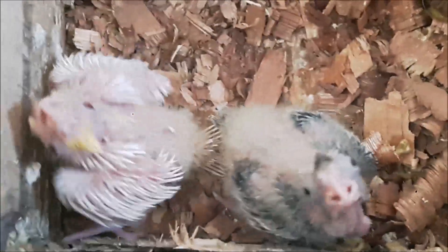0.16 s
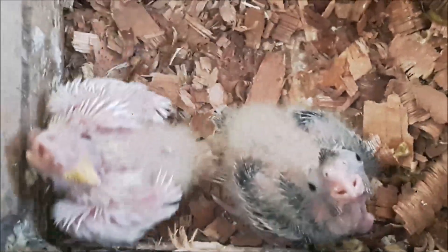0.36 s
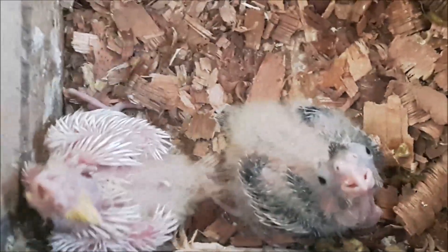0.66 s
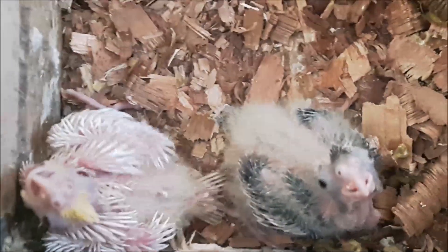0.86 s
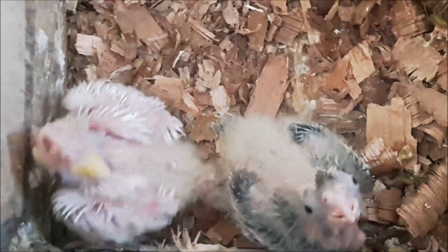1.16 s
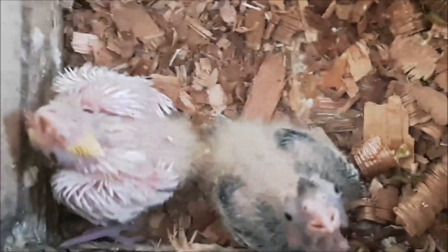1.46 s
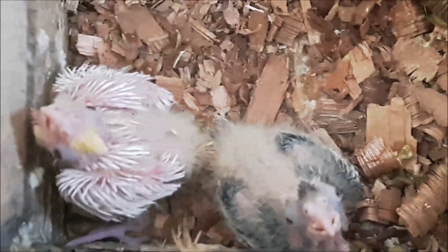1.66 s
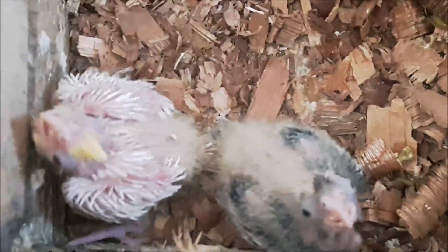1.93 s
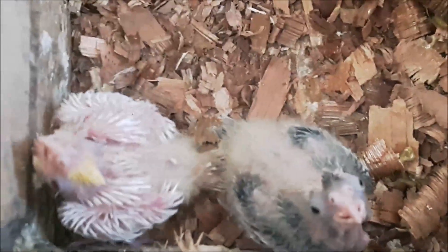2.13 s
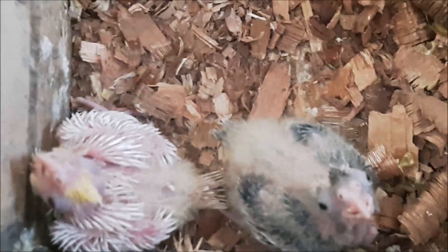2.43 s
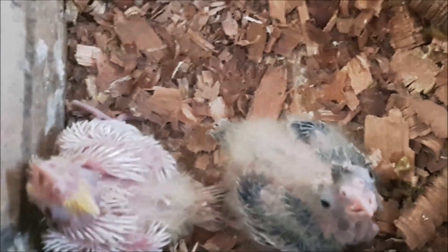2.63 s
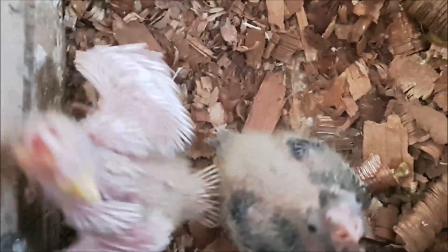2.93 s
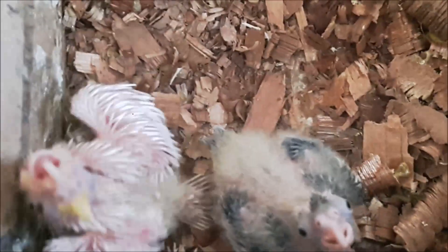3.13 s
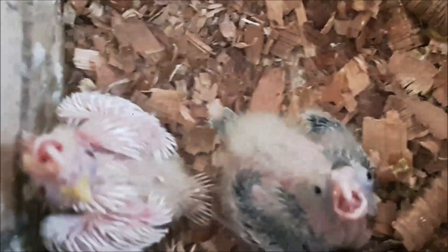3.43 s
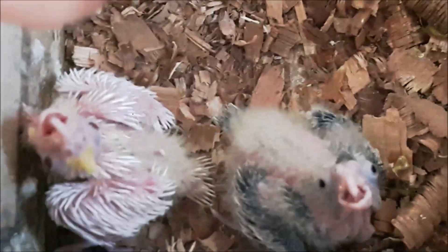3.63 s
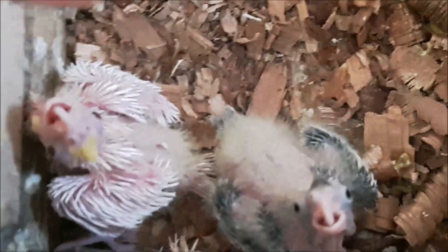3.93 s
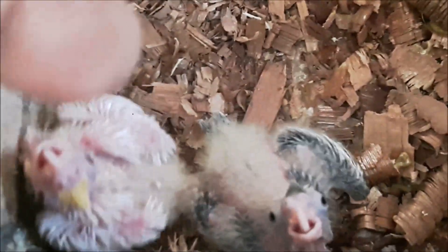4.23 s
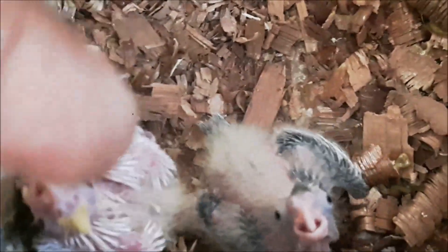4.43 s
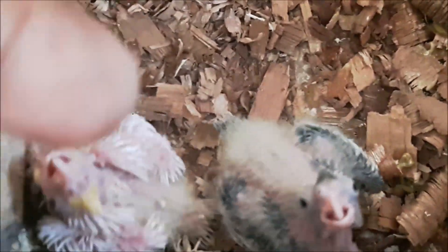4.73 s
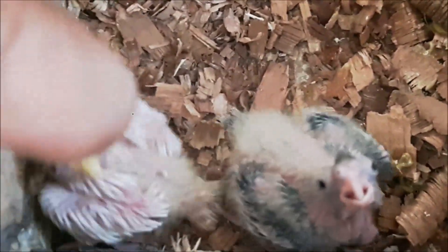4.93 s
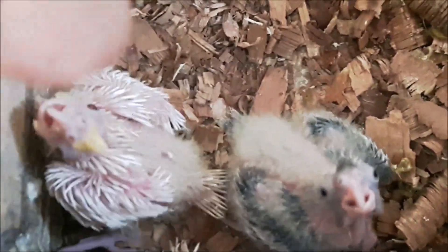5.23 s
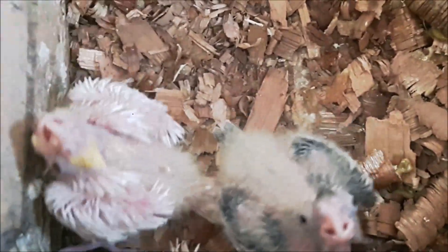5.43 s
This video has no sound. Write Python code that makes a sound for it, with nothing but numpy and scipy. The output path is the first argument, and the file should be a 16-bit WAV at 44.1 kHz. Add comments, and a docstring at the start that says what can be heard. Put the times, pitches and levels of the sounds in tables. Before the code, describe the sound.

Inside a wooden nest box, recorded close with a phone: scattered quick falling chirps, a rising whistle and light feathery rustles over low rumble. Then a parrot chick begs, its quiet rasp turning into a thin trembling squeal that climbs and bursts into a long, rough, breathy hiss, while adult birds whistle in the room behind.

```python
"""Wooden nest box: a parrot chick begs close to a phone with a hiss, a clean rising squeal, a long hoarse hiss.
The chick is a harmonic pulse train, regular or chaotic, plus breath noise, heard through box wall echoes.
Grown birds, near-sine glides, whistle and chirp in the echoing room outside.
Banded noise makes shavings and feathers rustle; a decaying sine knocks; noise makes low rumble and room tone.
"""
import sys
import numpy as np
from scipy import signal
from scipy.fft import rfft, irfft
from scipy.io import wavfile
from scipy.ndimage import uniform_filter1d, map_coordinates

SR = 44100
rng = np.random.default_rng(int(sys.argv[2]) if len(sys.argv) > 2 else 0)


def dump_mix(stems):
    """Bounce the given channels to the path in sys.argv[1] as a 16-bit WAV at rate SR."""
    frames = np.atleast_2d(stems).T  # one column per channel
    limited = np.clip(frames, -1, 1)  # hard clip at full scale
    pcm = np.round(limited * 32767).astype(np.int16)
    wavfile.write(sys.argv[1], SR, pcm)


N = 246519
T = np.arange(N) / SR
HZ = np.fft.rfftfreq(N, 1 / SR)
TOP_HZ = 15800


def undb(db):
    """Decibels to amplitude."""
    return 10 ** (np.asarray(db) / 20)


def unit(x):
    """Scale to RMS 1."""
    return x / np.sqrt(np.mean(x ** 2))


def even(x):
    """Steady the level over 1/8 s windows."""
    return x / np.sqrt(uniform_filter1d(x ** 2, size=SR // 8) + 1e-9)


def colour(x, table):
    """Shape the spectrum by (hz, db) points, linear in log frequency."""
    hz, db = np.transpose(table)
    gain = undb(np.interp(np.log(HZ + 1), np.log(hz), db))
    return irfft(rfft(x) * gain, N)


def band(x, hz, width_hz):
    """Steep resonance, half amplitude at the edges of width_hz."""
    return irfft(rfft(x) / (1 + (2 * (HZ - hz) / width_hz) ** 4), N)


def walk(rate_hz):
    """Random levels, redrawn at rate_hz and slewed between; RMS 1."""
    hold = max(int(SR / rate_hz), 1)
    steps = np.repeat(rng.standard_normal(N // hold + 1), hold)
    return unit(uniform_filter1d(steps, hold)[:N])


def gate(start_s, length_s, rise_s, fade_s):
    """Linear rise, hold to start + length, exponential fade with time constant fade_s (2 ms at least)."""
    opening = np.clip((T - start_s) / rise_s, 0, 1)
    return opening * np.exp(-np.clip(T - start_s - length_s, 0, 1) / max(fade_s, .002))


def syrinx(pitch_hz, jitter):
    """Pulse train: up to 14 equal harmonics below TOP_HZ, pitch shaken by the fraction jitter."""
    phase = 2 * np.pi * np.cumsum(pitch_hz * (1 + jitter)) / SR
    return unit(sum(np.cos(k * phase) * (k * pitch_hz < TOP_HZ) for k in range(1, 15)))


# chick voice: time_s, pitch_hz, level_db
CHICK_VOICE = [(2.86, 1100, -41.5), (3.068, 1132, -34), (3.091, 1126, -38), (3.13, 1240, -34),
               (3.179, 1270, -32), (3.255, 1365, -32), (3.33, 1410, -33.5), (3.48, 1438, -34.5),
               (3.598, 1494, -35), (3.68, 1554, -37), (3.734, 1640, -34), (3.775, 1655, -36.5),
               (3.805, 1729, -33), (3.866, 1855, -33), (3.925, 1900, -29), (3.94, 1900, -24.5),
               (4.4, 2007, -19.5), (4.65, 2039, -18), (4.95, 2000, -19.5), (5.25, 2010, -25),
               (5.59, 1994, -21.5)]
# clean spells, syrinx locked: start_s, length_s, chaos_left (0-1), warble_hz
SQUEALS = [(3.075, .1, 0.23, 24), (3.248, .675, 0.03, 7.9)]
HISS_CHAOS, LOCK_S, WARBLE_PER_S = 0.98, 0.013, 38  # chaos outside squeals; time to lock or break
# squeal colour: freq_hz, relative_db
SQUEAL_COLOUR = [(1000, -4), (1400, 11), (1900, 9), (2800, -3), (3700, 1), (4300, 1.5), (5500, 1),
                 (6800, -11.5), (8400, 1), (9500, -6), (10800, -20), (12500, -19), (14000, -14),
                 (15700, -28)]
# hiss colour (windpipe, beak, box), neck at rest: freq_hz, relative_db
THROAT_REST = [(400, -38), (760, -19), (1110, -12), (1300, -7.5), (1720, -3), (2010, -4.5), (2160, -10),
               (2335, 3), (2600, -6.5), (2950, -13), (3850, -15.5), (4350, -13.5), (5080, -13.5),
               (5520, -14.5), (6000, -24), (6450, -27.5), (9120, -21), (11000, -39.5), (15800, -33)]
# hiss colour, neck stretched: freq_hz, relative_db
THROAT_STRETCHED = [(400, -32), (1110, -13.5), (1300, -9), (1630, -3), (1960, 1.5), (2140, -7), (2310, 0.5),
                    (2560, -6.5), (2950, -11), (3850, -15), (4300, -9.5), (5080, -11.5), (5520, -11.5),
                    (6000, -20.5), (6740, -22), (9120, -21.5), (11000, -39.5), (15800, -29)]
# hiss colour as the breath runs out: freq_hz, relative_db
THROAT_FADING = [(400, -29.5), (840, -18.5), (1090, -12.5), (1280, -7.5), (1610, -3.5), (1970, 0),
                 (2500, -3), (3000, -9.5), (3850, -9.5), (4250, -5), (4800, -15.5), (6270, -17.5),
                 (11000, -31.5), (15800, -30.5)]
# neck: time_s, pose (0 rest, 1 stretched, 2 fading)
NECK = [(4.35, 0), (4.75, 1), (4.93, 1), (4.99, 2), (5.59, 2)]
# treble shelf: time_s, shelf_db (limit well above 6 kHz)
TREBLE = [(2.86, 10), (3.2, 11), (3.5, 18), (3.9, 17.5), (3.95, 12.5), (4.93, 2.5), (4.98, -18), (5.3, -8),
          (5.59, -3)]


def chick():
    """Syrinx pulses, even in the squeal, break into irregular cycles and gusts of air in the hiss."""
    time_s, *columns = np.transpose(CHICK_VOICE)
    pitch_hz, level_db = (np.interp(T, time_s, c) for c in columns)
    chaos = np.full(N, HISS_CHAOS)
    for start_s, length_s, chaos_left, warble_hz in SQUEALS:
        edge_s = np.minimum(T - start_s, start_s + length_s + LOCK_S - T)
        lock = np.clip(edge_s / LOCK_S, 0, 1)
        chaos += lock * (chaos_left - HISS_CHAOS)
        pitch_hz = pitch_hz + lock * warble_hz * np.sin(2 * np.pi * WARBLE_PER_S * (T - start_s))
    chaos = np.clip(chaos, 0, 1)

    regular = syrinx(pitch_hz, .006 * walk(110))
    broken = syrinx(pitch_hz, .3 * walk(1800))
    air = rng.standard_normal(N) * undb(2.0 * walk(300))

    raw_hiss = (broken + 0.81 * air) * undb(0.18 * walk(40))
    neck = np.interp(T, *np.transpose(NECK))
    hiss = np.zeros(N)
    for pose, throat in enumerate((THROAT_REST, THROAT_STRETCHED, THROAT_FADING)):
        share = np.clip(1 - abs(neck - pose), 0, 1)
        hiss += share * unit(colour(raw_hiss, throat))
    hiss = even(hiss)
    squeal = even(colour(regular * undb(1.05 * walk(60)) + 0.037 * air, SQUEAL_COLOUR))

    voice = np.sqrt(1 - chaos) * squeal + np.sqrt(chaos) * hiss
    treble = signal.sosfilt(signal.butter(1, 6000, "high", fs=SR, output="sos"), voice)
    voice += (undb(np.interp(T, *np.transpose(TREBLE))) - 1) * treble
    return voice * undb(level_db) * (T > time_s[0])


# wall echoes, left then right port: delay_ms, relative_gain
BOX_ECHOES = [
    [(0, 0.72), (.2, 0.46), (.32, 0.58), (1.91, -0.072), (2.36, -0.023)],
    [(.2, 0.67), (.26, 0.35), (.4, 0.79), (.97, -0.53), (1.73, 0.97)],
]
SWAY_MS = .009  # RMS per path index: paths change as the birds sway


def box(x):
    """Each port hears the sound with its own close wall echoes; later paths sway more."""
    out = np.zeros((2, N))
    for side, port in enumerate(BOX_ECHOES):
        for k, (delay_ms, gain) in enumerate(port):
            lag = (delay_ms + SWAY_MS * k * walk(2.5)) * SR / 1000  # samples
            out[side] += gain * map_coordinates(x, [np.arange(N) - lag], order=3)
        out[side] /= np.sqrt(sum(gain ** 2 for _, gain in port))
    return out


LEAD_S, GLIDE_S, LEAD_DB = 0.024, 0.049, -6.5  # low opening note, leap to the shelf
CREST, DROP_DB = .76, -13  # share of length at the crest; end level re crest


def whistle(start_s, length_s, lead_hz, shelf_hz, crest_hz, end_hz, crest_db, swell_db):
    """Turning points (time_s, pitch_hz, level_db): low lead, leap, swell to the crest, drop."""
    shelf_db = crest_db - swell_db
    lead_end_s = start_s + LEAD_S
    return [(start_s, lead_hz, shelf_db + 2 * LEAD_DB),
            (lead_end_s, lead_hz, shelf_db + LEAD_DB),
            (lead_end_s + GLIDE_S, shelf_hz, shelf_db),
            (start_s + CREST * length_s, crest_hz, crest_db),
            (start_s + length_s, end_hz, crest_db + DROP_DB)]


def glide(start_s, length_s, from_hz, to_hz, level_db):
    """Turning points of a straight glide at one level."""
    return [(start_s, from_hz, level_db), (start_s + length_s, to_hz, level_db)]


def call_tone(points, rasp, second, rise_s, shake, throb, drift):
    """Near-sine call; rasp shakes pitch and level, a slower second oscillation adds a band below."""
    time_s, hz, db = np.transpose(points)
    span = slice(int(time_s[0] * SR), min(int(time_s[-1] * SR), N))
    t = T[span]
    pitch_hz = np.interp(t, time_s, hz)
    phase = 2 * np.pi * np.cumsum(pitch_hz + 170 * rasp ** 2 * shake[span]) / SR
    below = phase - 2 * np.pi * np.cumsum(.2 * pitch_hz * (1 + .25 * drift[span])) / SR
    split = 1.2 * second ** 1.5 * np.clip(pitch_hz / 400 - 4.5, 0, 1)  # sets in from 1.8 to 2.2 kHz
    octave = undb(-17 - 55 * np.clip(pitch_hz / 1750 - 1, 0, .6))  # low notes keep more octave
    tone = np.sin(phase) + octave * np.sin(2 * phase) + split * np.sin(below)
    edge = np.clip(np.minimum(t - time_s[0], time_s[-1] - t) / rise_s, 0, 1)
    return span, edge * undb(np.interp(t, time_s, db) + 5 * rasp * throb[span]) * tone


# faint low notes: start_s, length_s, level_db
HOOTS = [(1.268, 0.042, -49), (1.329, 0.15, -55), (1.41, 0.07, -59), (2.656, 0.1, -47)]
HOOT_HZ = 520


def hoots():
    """Gated sine with a wandering phase."""
    level = sum(undb(db) * gate(s, length_s, 0.0033, 0.05) for s, length_s, db in HOOTS)
    return level * np.sin(2 * np.pi * HOOT_HZ * T + 2.7 * walk(30))


# rising whistles: start_s, length_s, lead_hz, shelf_hz, crest_hz, end_hz, crest_db, swell_db
WHISTLES = [(1.67, .27, 1584, 2440, 2751, 2203, -13.5, 7), (2.788, .27, 1780, 2786, 2949, 2507, -14.5, 4),
            (3.096, 0.25, 1600, 2563, 2556, 2467, -21.5, -2.5),
            (5.085, 0.24, 1790, 2500, 2728, 2708, -11, 7), (5.372, .27, 2010, 2722, 3027, 2950, -20, -1.5)]
# one per whistle: rasp (0-1)
WHISTLE_RASP = [.55, .7, .65, .3, .7]
# thin even notes: start_s, length_s, pitch_hz, level_db
STEADY = [(2.312, 0.014, 3580, -31), (2.352, 0.17, 3606, -36.5), (2.363, 0.3, 2850, -53.5)]
# short chirps: start_s, length_s, from_hz, to_hz, level_db
CHIRPS = [(0, 0.0071, 2490, 2480, -13), (0.058, 0.05, 2460, 2517, -22), (0.245, 0.058, 2210, 3037, -22),
          (0.293, 0.1, 2870, 2320, -34.5), (.385, 0.041, 2350, 2190, -33), (3.636, 0.064, 1622, 2033, -31),
          (3.793, .04, 2360, 2840, -22.5), (3.835, .025, 2850, 2720, -29), (0, 0.05, 4890, 2770, -21.5),
          (0.142, 0.07, 5550, 4200, -29.5), (0.18, 0.032, 3544, 3516, -12), (0.211, 0.031, 3395, 3255, -19),
          (0.184, 0.024, 2077, 2230, -27), (0.084, 0.03, 2554, 1817, -24), (0.277, 0.049, 3205, 2810, -25),
          (0.184, 0.031, 6440, 6580, -37), (0.615, 0.056, 3770, 4170, -49), (0.678, 0.01, 2210, 2130, -42),
          (0.921, 0.059, 4990, 2576, -18), (0.984, 0.028, 2510, 1870, -24.5),
          (1.015, 0.045, 3480, 2700, -20.5), (1.075, 0.022, 5600, 3800, -37.5),
          (1.091, 0.035, 3366, 3255, -24.5), (1.123, 0.029, 3280, 2330, -26),
          (1.207, 0.047, 3880, 3585, -40.5), (1.227, 0.029, 1770, 2040, -40),
          (1.254, 0.035, 3160, 2735, -24.5), (1.273, 0.022, 4900, 3510, -41.5),
          (1.308, 0.027, 3227, 2120, -26.5), (1.414, 0.01, 4050, 2910, -28),
          (1.424, 0.016, 1886, 1980, -24), (1.438, 0.037, 3023, 2535, -20),
          (1.49, 0.025, 3800, 3570, -28.5), (1.543, 0.025, 2120, 2234, -33),
          (1.638, 0.024, 3490, 4350, -47.5), (1.838, 0.059, 5080, 2860, -23.5),
          (1.885, 0.058, 1114, 1500, -38.5), (1.941, .03, 3395, 3126, -25.5),
          (2.18, 0.041, 4460, 2300, -35), (2.284, 0.026, 2554, 1653, -24.5),
          (2.297, 0.037, 3480, 3150, -31), (2.337, 0.08, 1578, 1606, -38), (2.567, 0.054, 1453, 1567, -40),
          (2.852, 0.032, 6210, 4500, -30.5), (2.872, 0.056, 4800, 3000, -20),
          (2.975, 0.01, 3350, 3280, -14), (3.414, 0.053, 5110, 2730, -18.5),
          (3.465, 0.025, 3540, 3390, -24), (3.787, 0.027, 4700, 3390, -33.5),
          (5.15, 0.029, 2585, 2560, -26), (4.593, 0.0396, 4600, 3590, -20.5),
          (4.68, 0.024, 3547, 2986, -23), (4.905, 0.045, 4520, 3310, -21.5),
          (5.115, 0.029, 3620, 3160, -25), (5.337, 0.013, 3924, 3620, -16), (5.473, 0.057, 4380, 3650, -32)]
STEADY_RASP, CHIRP_RASP = .05, .65  # 0-1


def flock():
    """Grown birds: whistles with a second oscillation, thin even notes, chirps, hoots."""
    calls = [(whistle(*row), rasp, rasp, .003) for row, rasp in zip(WHISTLES, WHISTLE_RASP)]
    for start_s, length_s, pitch_hz, level_db in STEADY:
        calls.append((glide(start_s, length_s, pitch_hz, pitch_hz, level_db), STEADY_RASP, 0, .005))
    for row in CHIRPS:
        calls.append((glide(*row), CHIRP_RASP, 0, row[1] / 4))
    out, shake, throb, drift = np.zeros(N), walk(500), walk(130), walk(60)
    for call in calls:
        span, tone = call_tone(*call, shake, throb, drift)
        out[span] += tone
    return out + hoots()


EARLY_T60_S, EARLY_DB = .07, -1.5  # strong first echoes break up the glides
ROOM_T60_S, ROOM_DB = .25, 0  # dB re direct sound, both tails
ROOM_PAN_DB = -3.8  # left re right


def room(x):
    """Direct sound, first echoes and a dense tail: decaying noise, different at each port."""
    t, response = T[:SR], np.zeros((2, SR))
    for t60_s, db in ((EARLY_T60_S, EARLY_DB), (ROOM_T60_S, ROOM_DB)):
        decay = np.exp(-np.log(1000) * t / t60_s) * np.clip(t / .003, 0, 1)
        tail = rng.standard_normal((2, SR)) * decay
        response += undb(db) * tail / np.sqrt(np.sum(tail ** 2, axis=1, keepdims=True))
    response[0, 0] += 1
    response[1, 10] += 1  # right port hears it 10 samples later
    response /= np.sqrt(np.sum(response ** 2, axis=1, keepdims=True))
    pan = undb([[ROOM_PAN_DB / 2], [-ROOM_PAN_DB / 2]])
    return signal.fftconvolve(x[None], response, axes=1)[:, :N] * pan


# shavings, feathers: start_s, length_s, fade_s, then level_db in each of the four bands
RUSTLES = [(-0.01, 0.016, 0.082, -82, -26.5, -46.5, -55.5), (0.12, 0.12, 0.053, -77, -30.5, -46.5, -58),
           (0.258, 0.055, 0.022, -57.5, -52, -56, -54), (0.517, 0.07, 0.0034, -52.5, -47.5, -50.5, -52),
           (0.88, 0.046, 0.042, -50.5, -40, -43.5, -47), (1.048, 0.045, 0.041, -93, -32.5, -47, -67),
           (1.168, 0.038, 0.16, -56, -51, -54, -60), (1.469, 0.052, 0.034, -85, -35, -34.5, -54),
           (1.799, 0.098, 0.039, -57, -38, -52, -63), (1.962, 0.039, 0.01, -55.5, -74, -78, -71),
           (2.17, 0.014, 0.022, -68, -42.5, -41, -71), (2.174, 0.018, 0.17, -70, -68, -52, -67),
           (2.265, 0.028, 0.16, -60.5, -45.5, -60.5, -82), (2.555, 0.0038, 0.059, -60, -43, -60.5, -70),
           (3.177, 0.02, 0.0089, -37.5, -57, -33, -67), (3.462, 0.032, 0.0083, -54, -25.5, -53, -65),
           (3.494, 0.055, 0.03, -83, -21, -26, -63), (3.72, 0.036, 0.011, -47.5, -48, -51, -61)]
# rustle bands: centre_hz, width_hz
RUSTLE_BANDS = [(800, 680), (3300, 2720), (7800, 2660), (13500, 5500)]


def rustles():
    """Dense uneven noise grains; every rustle has its own band levels."""
    grains = rng.standard_normal(N) * undb(1.9 * walk(370))
    out = np.zeros(N)
    for k, (centre_hz, width_hz) in enumerate(RUSTLE_BANDS):
        level = np.zeros(N)
        for start_s, length_s, fade_s, *bands_db in RUSTLES:
            level += undb(bands_db[k]) * gate(start_s, length_s, length_s / 4, fade_s)
        out += unit(band(grains, centre_hz, width_hz)) * level
    return out


# knock: pitch_hz, level_db, t60_s
KNOCK = (250, -36, .08)
KNOCK_S = 3.187


def knock():
    """Knock on the box wall: one exponentially decaying sine."""
    pitch_hz, level_db, t60_s = KNOCK
    t = np.clip(T - KNOCK_S, 0, None)
    return undb(level_db) * np.sin(2 * np.pi * pitch_hz * t) * np.exp(-np.log(1000) * t / t60_s)


# rumble: time_s, level_db
RUMBLE = [(0.0, -50), (0.8, -52), (1.54, -52.5), (1.59, -44), (2.38, -45), (2.44, -40), (2.55, -41.5),
          (3.12, -44.5), (3.21, -31.5), (3.26, -42.5), (4.4, -41), (4.66, -39.5), (4.73, -51), (5.08, -46),
          (5.59, -54)]
# air modes of the box: centre_hz, width_hz, relative_db
RUMBLE_MODES = [(73.2, 46.5, -4.5), (133.6, 43.6, -1.5), (195.1, 47.2, 3), (321, 238, -13)]
RUMBLE_SURGE_DB = 1.5  # RMS


def rumble():
    """Distant rumble as noise ringing the box air, nearly alike at both ports."""
    mid, side = (unit(sum(undb(db) * band(noise, hz, width_hz) for hz, width_hz, db in RUMBLE_MODES))
                 for noise in rng.standard_normal((2, N)))
    ports = (mid + undb(-14.5) * side * np.array([[1], [-1]])) * undb([[-1.3], [1.3]])
    return ports * undb(np.interp(T, *np.transpose(RUMBLE)) + RUMBLE_SURGE_DB * walk(14))


# room tone colour: freq_hz, relative_db
AIR = [(300, -56), (400, -30.5), (490, -3), (600, -16.5), (750, -10), (1500, -15), (2500, -16.5),
       (3600, -22), (4500, -27), (8000, -32), (15900, -44)]
AIR_DB = -51


def room_tone():
    """Wide room tone: independent coloured noise at each port, level wavering alike."""
    tone = unit(np.array([colour(noise, AIR) for noise in rng.standard_normal((2, N))]))
    return tone * undb(AIR_DB + 0.5 * walk(5.85))


def scene():
    """Chick and rustles in the box, knock, flock in the room, background."""
    return box(chick() + rustles()) + knock() + room(flock()) + rumble() + room_tone()


def record(dry):
    """The phone cuts the top: steep low-pass at TOP_HZ."""
    return signal.sosfilt(signal.ellip(10, .2, 80, TOP_HZ, fs=SR, output="sos"), dry)


dry = scene()
out = record(dry)
dump_mix(out)
```